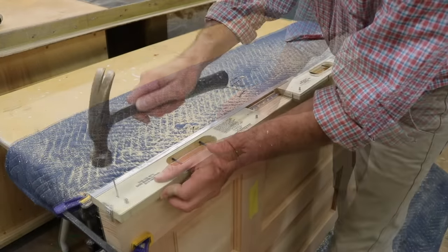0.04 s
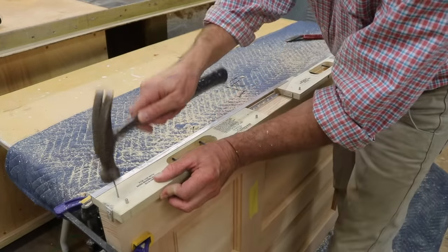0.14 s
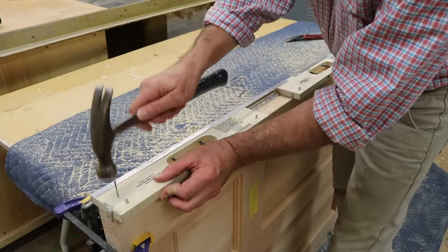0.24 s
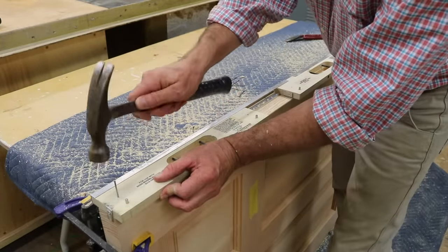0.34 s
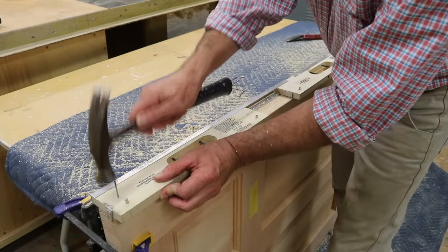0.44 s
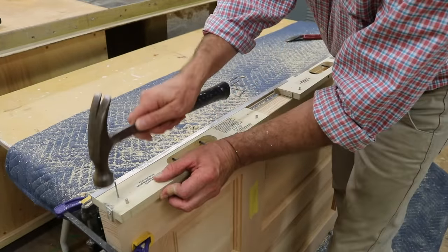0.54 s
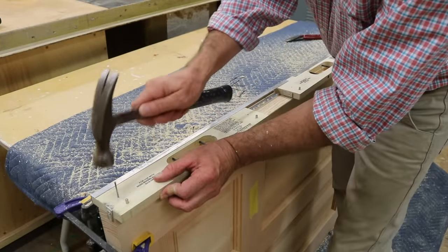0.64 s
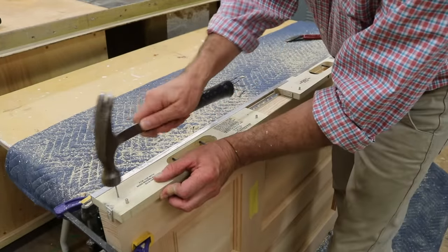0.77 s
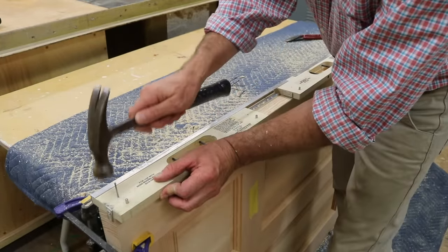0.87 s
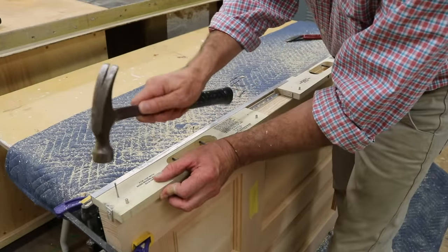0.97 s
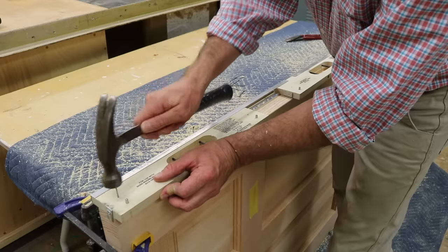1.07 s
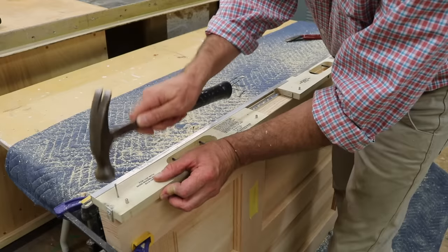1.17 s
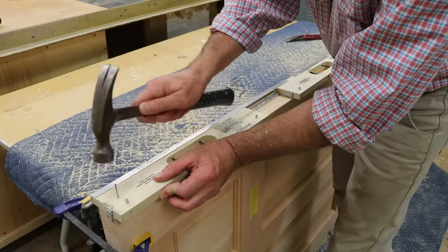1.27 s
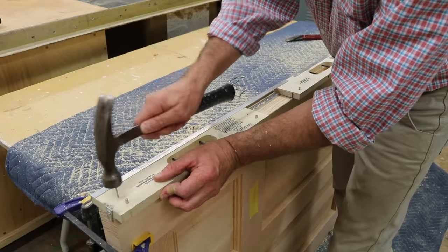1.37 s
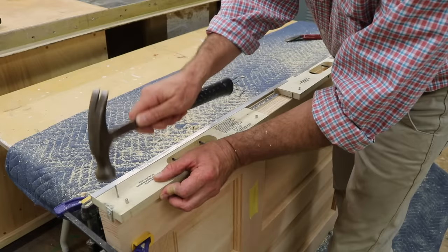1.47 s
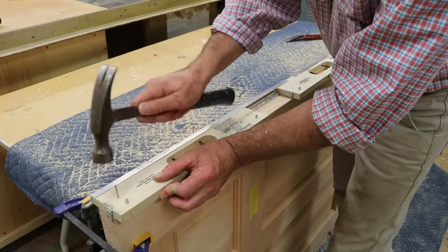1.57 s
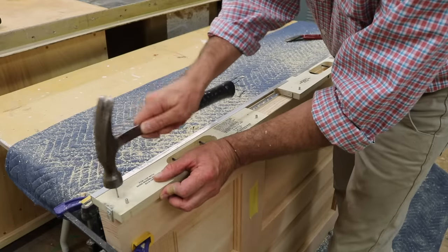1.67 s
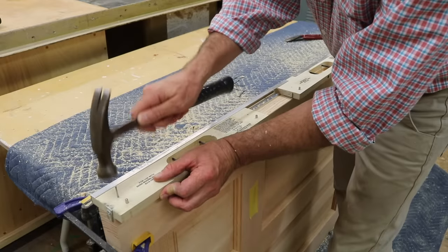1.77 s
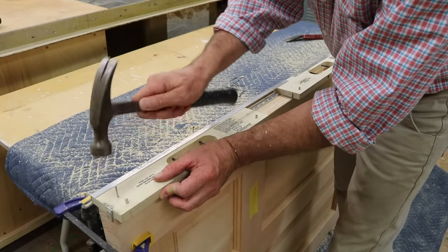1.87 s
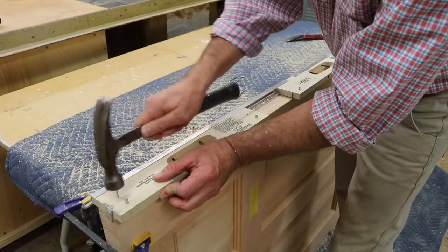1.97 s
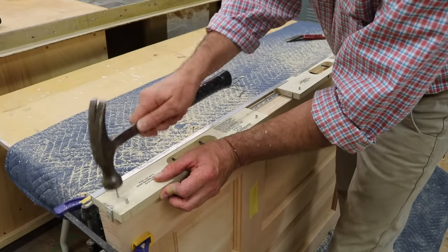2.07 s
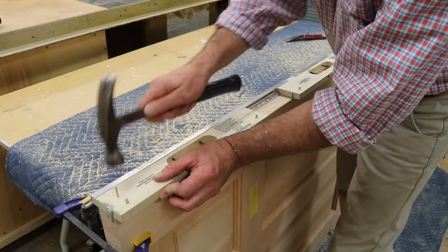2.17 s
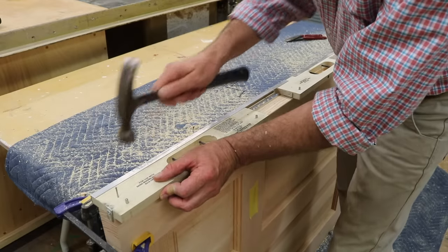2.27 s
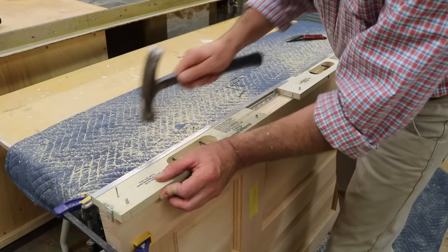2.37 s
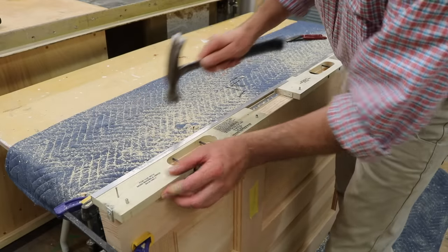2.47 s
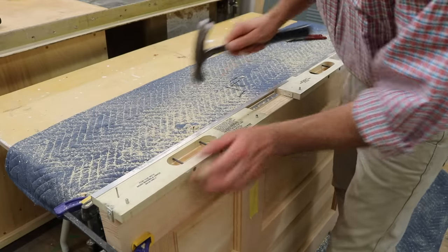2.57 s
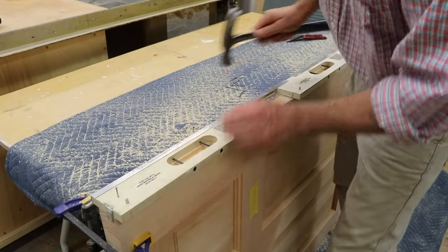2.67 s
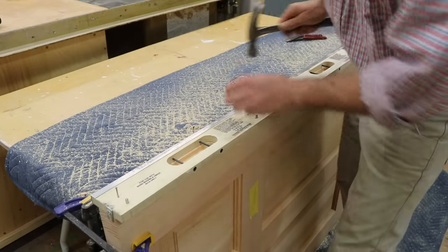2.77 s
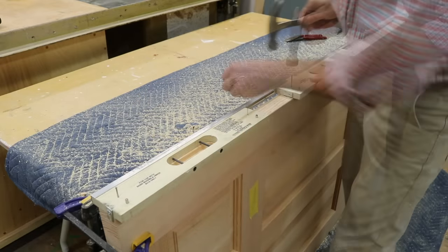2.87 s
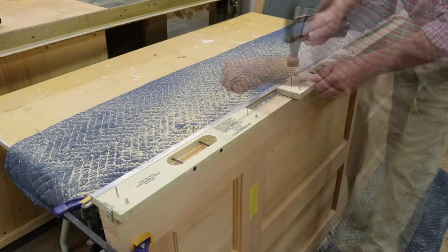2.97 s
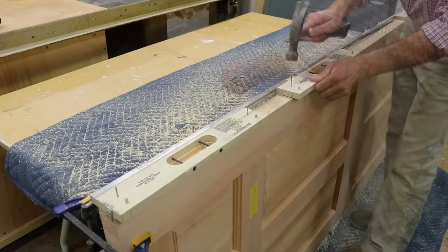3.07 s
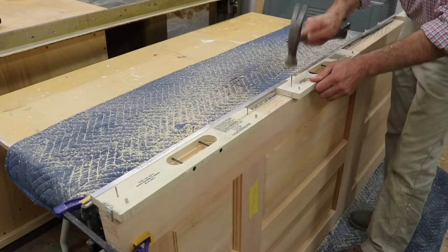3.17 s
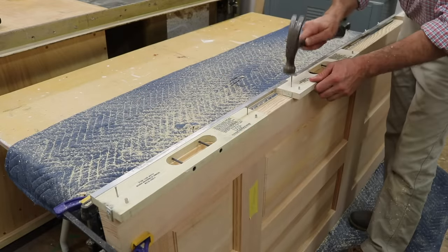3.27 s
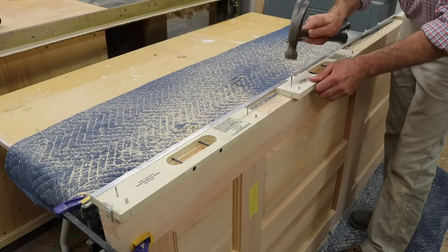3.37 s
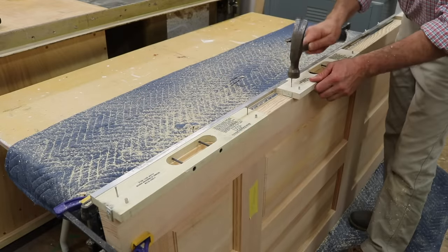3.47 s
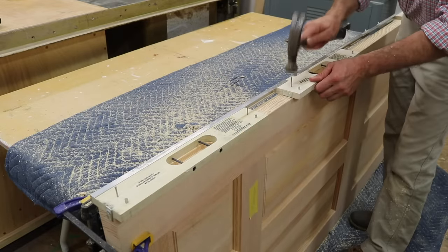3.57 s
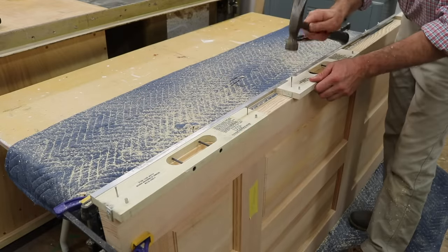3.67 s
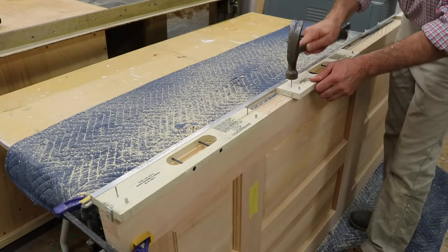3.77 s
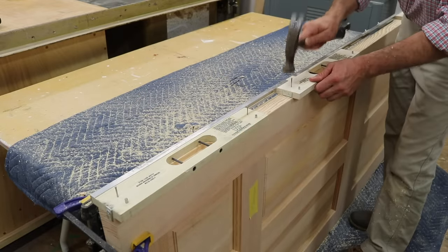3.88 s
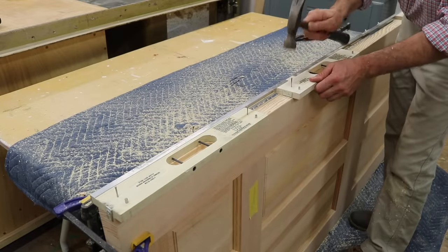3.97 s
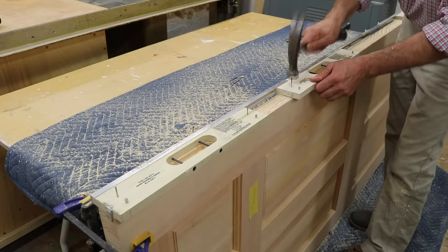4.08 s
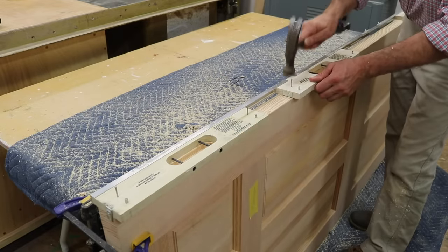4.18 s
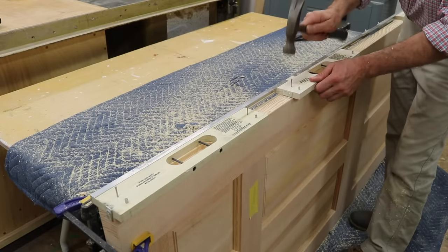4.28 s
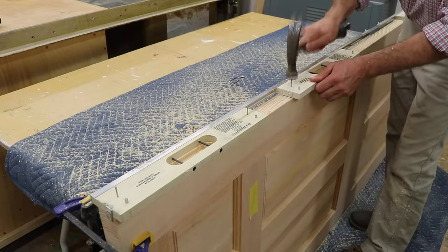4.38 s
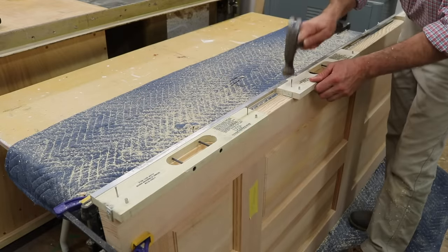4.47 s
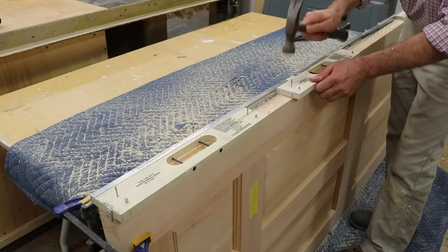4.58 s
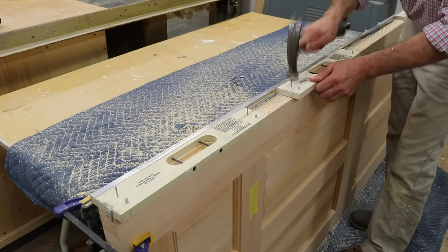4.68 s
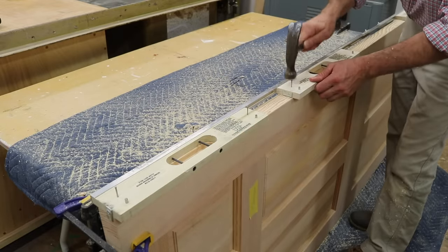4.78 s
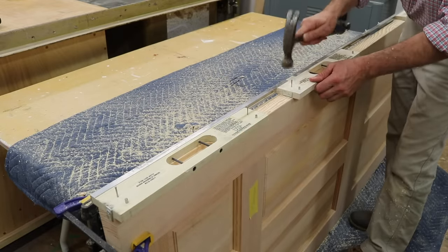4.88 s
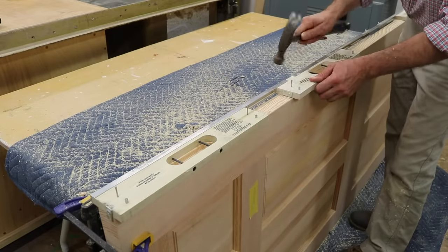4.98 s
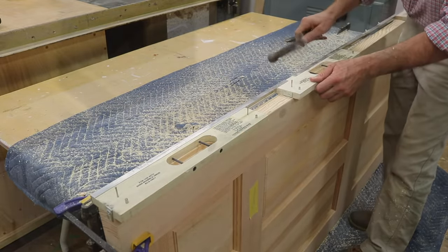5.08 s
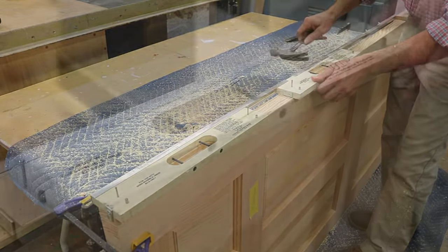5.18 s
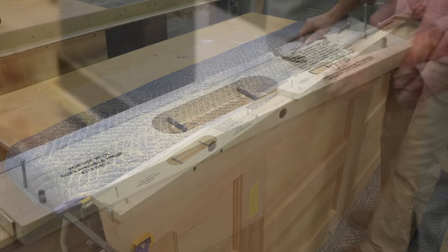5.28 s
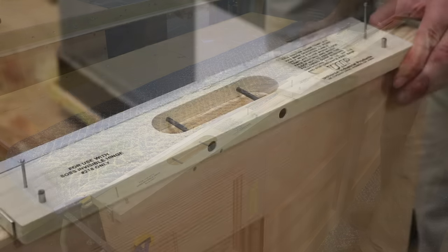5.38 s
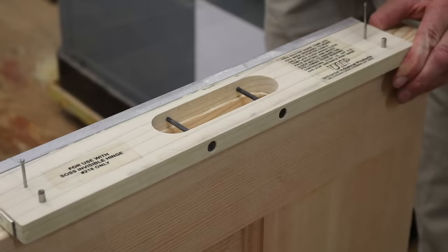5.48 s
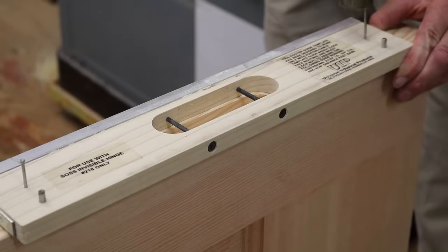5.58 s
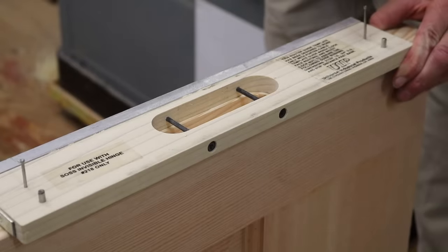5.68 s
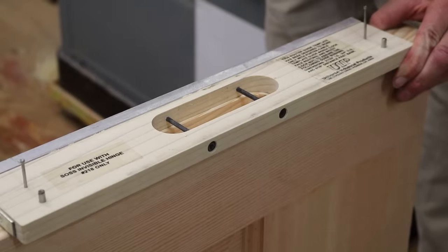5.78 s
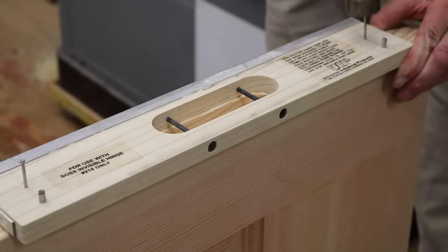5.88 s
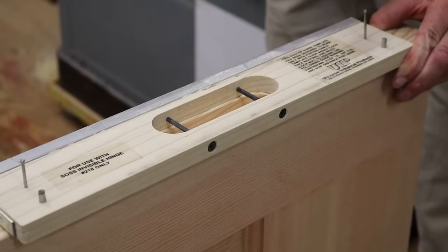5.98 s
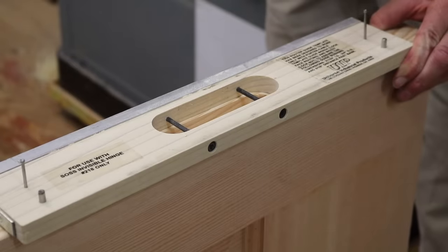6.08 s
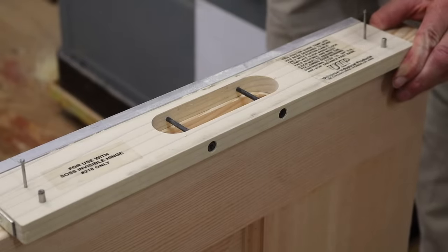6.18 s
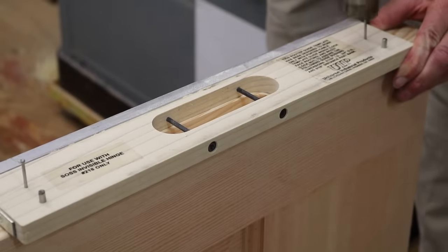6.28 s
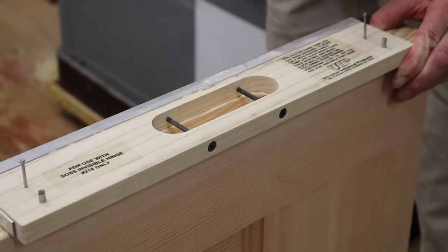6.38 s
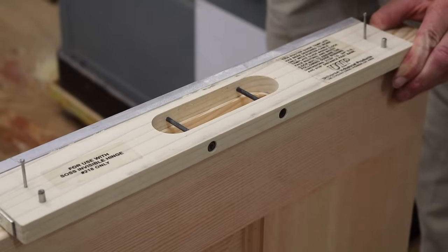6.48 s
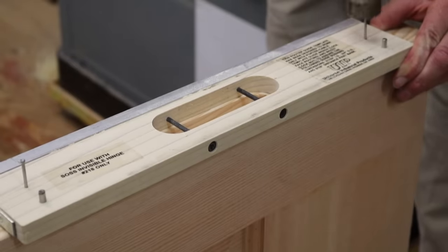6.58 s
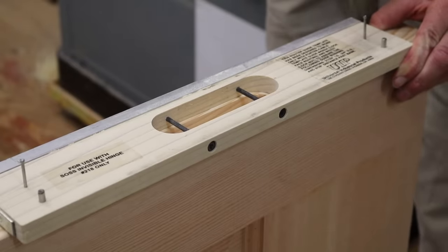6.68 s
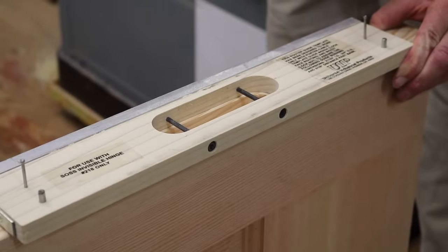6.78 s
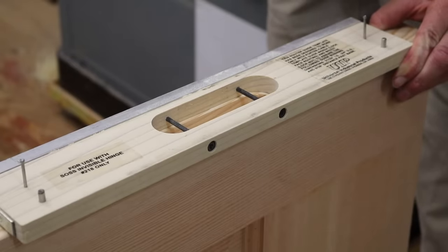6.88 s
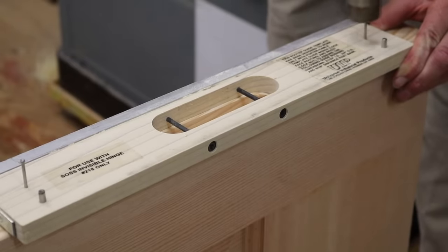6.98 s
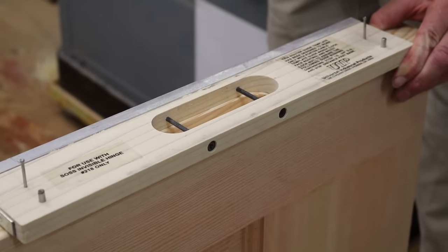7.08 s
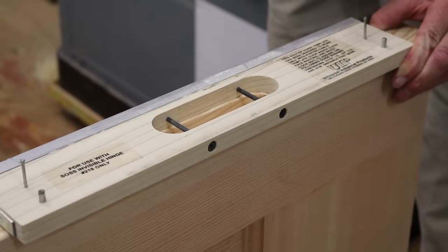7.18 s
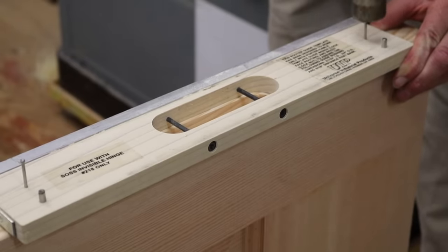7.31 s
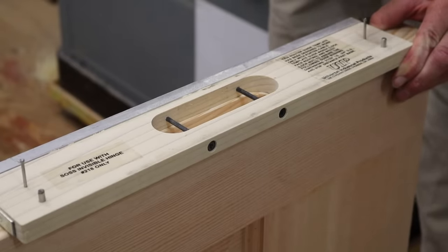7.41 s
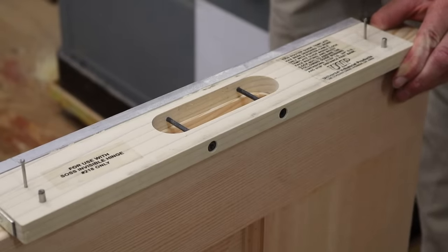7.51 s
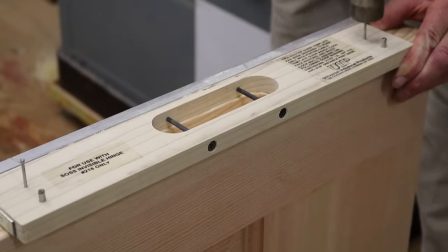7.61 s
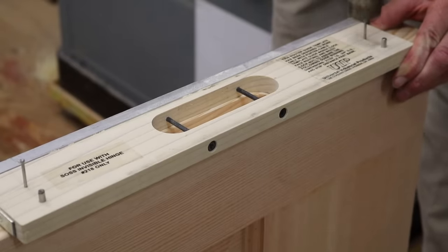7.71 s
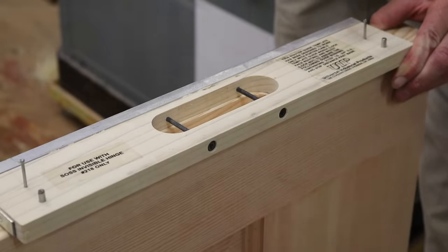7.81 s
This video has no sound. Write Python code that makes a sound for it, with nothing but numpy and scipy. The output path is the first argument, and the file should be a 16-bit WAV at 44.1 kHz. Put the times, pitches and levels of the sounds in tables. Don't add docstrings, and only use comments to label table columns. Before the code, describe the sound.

Close up in a lively workshop, a hammer drives three nails through a wooden jig into a door. Seven even blows, a pause of rustling sleeves and shifting feet, six more, another pause, then seven. Each set starts with a light metallic ping and grows to hard cracks with woody thumps and short room reverberation, over soft steady hiss.

```python
import sys
import numpy as np
from scipy import signal
from scipy.fft import rfft, irfft, next_fast_len
from scipy.io import wavfile
from scipy.ndimage import map_coordinates

SR = 44100
rng = np.random.default_rng(int(sys.argv[2]) if len(sys.argv) > 2 else 0)


def volts(x):
    e = np.asarray(x, float) / 20
    return 10 ** e


def generate_wav(signal):
    frames = np.transpose(np.atleast_2d(signal))
    scaled = np.clip(frames, -1, 1) * 32767
    pcm = np.round(scaled).astype(np.int16)
    wavfile.write(sys.argv[1], SR, pcm)


N = 346089
LONG = 2 ** 15

# ping_hz, width_hz, level_db, slip_s before the wood answers
SETTING = [
    (10930, 1500, 15.5, 0.0074),
    (11900, 510, -4, 0.00105),
    (11860, 460, 22, .01),
]


def unit(x):
    return x / np.sqrt(np.mean(x ** 2) + 1e-20)


def along(points, hz):
    f, v = np.transpose(points)
    return np.interp(np.log(hz + 1), np.log(f + 1), v)


def filtered(x, response):
    size = 2 * next_fast_len(x.shape[-1])
    spectrum = rfft(x, size) * response(np.fft.rfftfreq(size, 1 / SR))
    return irfft(spectrum)[..., :x.shape[-1]]


def noise(size, spectrum):
    return unit(filtered(rng.standard_normal(size), lambda hz: volts(along(spectrum, hz))))


def fade(t, t60, rise):
    return volts(-60 * t / t60) * (1 - np.exp(-t / rise))


def add(track, s, sound):
    track[round(s * SR):][:len(sound)] += sound


def room(room_db, rise):
    # band_hz, t60_s
    shop_t60 = [(60, 0.54), (200, 0.45), (600, 0.52), (1500, 0.55), (4000, 0.53), (8000, 0.47),
                (15000, 0.34)]
    # band_hz, level_db
    shop_colour = [(60, -33.5), (200, 15), (600, 4), (2000, -1), (5000, -2.5), (9000, -5.5), (15000, -7.5)]
    hz, t, z = signal.stft(rng.standard_normal(LONG), SR, nperseg=256)
    shape = along(shop_colour, hz)[:, None] - 60 * t / along(shop_t60, hz)[:, None]
    tail = signal.istft(z * volts(shape), SR, nperseg=256)[1][:LONG]
    tail = tail * (1 - np.exp(-np.arange(LONG) / (rise * SR)))
    return volts(room_db) * tail / np.linalg.norm(tail)


def resonance(modes, top_hz):
    f = np.fft.rfftfreq(LONG // 4, 1 / SR)
    power = 0
    for centre, width, db in modes:
        damping = (f * width) ** 2
        peak = damping / ((centre * centre - f * f) ** 2 + damping)
        power = power + volts(2 * db) * peak ** 1.28
    dulled = power / (1 + (f / top_hz) ** 2) ** 2
    cepstrum = irfft(np.log(dulled + 1e-9) / 2)
    cepstrum[1:len(f) - 1] *= 2
    cepstrum[len(f):] = 0
    pulse = irfft(np.exp(rfft(cepstrum)))[:len(f)]
    return pulse / np.linalg.norm(pulse)


def strike(modes, top_hz, t60, rise, room_db):
    grain = 0.3
    contact = rng.standard_normal(LONG) * fade(np.arange(LONG) / SR, t60, rise)
    contact = contact / np.linalg.norm(contact)
    click = np.arange(LONG) == 0
    sent = grain * contact + np.sqrt(1 - grain ** 2) * click
    echo = signal.fftconvolve(sent[:LONG // 8], room(room_db, rise + 0.0005))[:LONG]
    struck = signal.fftconvolve(contact + echo, resonance(modes, top_hz))
    return struck * np.sqrt(t60 * SR / 120)


def swells(moves):
    t = np.arange(N) / SR
    power = 0
    for s, length, db in moves:
        phase = np.clip((t - s) / length, -.5, .5)
        power = power + volts(2 * db) * np.cos(np.pi * phase) ** 4
    return np.sqrt(power)


def nails():
    # start_s, click_db, knock_db, nail_ring_hz, ring_over_knock_db
    blows = [(0.2137, -9.5, -24, 990, -19), (0.524, -8.5, -14, 760, -26), (.826, -1, -12.5, 1200, -21),
             (1.1214, 3.5, -10, 1466, -3), (1.42, 6.5, -7, 1693, -7.5), (1.719, 8.5, -4, 1875, -7),
             (2.0378, 12, -2, 2130, -12), (3.2741, -10, -13, 1121, -0.5), (3.5331, 0.5, -9.5, 1200, 0),
             (3.834, 4.5, -6.5, 1447, -3), (4.146, 6.5, -3.5, 1520, -12), (4.4452, 10.5, -1.5, 1326, -29),
             (4.746, 11.5, -0.9, 1290, -17), (5.6079, -23.5, -21.5, 593, -19),
             (5.9174, -5.5, -8.5, 1032, -0.5), (6.261, 3.5, -8.5, 1490, -5.5), (6.625, 8.5, -5, 1894, -3),
             (6.989, 12, -4.5, 2200, -11), (7.342, 16, -2.5, 2800, -13), (7.662, 16.5, -3, 2720, -14)]
    next_nail = [3, 5.4]
    places = np.searchsorted(next_nail, [row[0] for row in blows])
    return zip(blows, places, np.diff(places, prepend=-1) > 0)


def hiss():
    # band_hz, level_db per Hz
    hiss_colour = [(12, -47), (20, -9), (91, 1.5), (966, -5), (2730, -9.5), (5210, -13), (15200, -13.5),
                   (16500, -20.5)]
    return volts(-64) * noise(N, hiss_colour)


def handling(track):
    # start_s, peak_db, pitch_hz, width_hz
    ticks = [(.037, -50, 850, 300), (.102, -52, 550, 200), (.113, -35, 800, 350), (2.424, -46, 3500, 3000),
             (2.438, -28, 800, 250), (2.589, -32, 1100, 1200), (2.62, -42, 500, 500),
             (2.635, -45, 1300, 1500), (3.18, -52, 480, 300), (3.206, -46, 1300, 900),
             (5.204, -42, 900, 1200), (5.299, -37, 900, 1200), (5.507, -36, 550, 600)]
    # peak_s, length_s, level_db
    sleeves = [
        (0, 0.091, -68),
        (2.52, 0.48, -57),
        (2.65, 0.21, -63.5),
        (2.89, 0.29, -58.5),
        (5.2, 0.47, -63),
        (5.37, 0.9, -59.5),
    ]
    # peak_s, length_s, level_db
    feet = [
        (.11, 0.48, -66),
        (2.48, 0.74, -60),
        (3.22, .2, -65),
        (5.17, 0.55, -60),
        (5.52, .3, -58.5),
    ]
    # band_hz, level_db per Hz
    cloth = [(100, -2), (250, 4), (500, 2.5), (900, -2), (1500, -7), (3000, -13.5), (5000, -21.5),
             (9000, -30)]
    # band_hz, level_db per Hz
    rumble = [(12, -21), (25, -16), (60, -16), (95, 0), (140, -6.5), (300, -33.5)]
    for s, db, hz, width in ticks:
        modes = [(hz, width, 0), (2500, 4000, -24)]
        add(track, s, volts(db) * strike(modes, 6000, t60=.02, rise=.0005, room_db=-7))
    waver_db = 2.5 * map_coordinates(rng.standard_normal(300), [np.linspace(0, 299, N)])
    brush = noise(N, cloth) * volts(waver_db)
    track[:N] += swells(sleeves) * brush
    track[:N] += swells(feet) * noise(N, rumble)


def steel(track):
    # pitch_hz, width_hz, level_db
    crack = [(2660, 2700, 4), (12200, 14000, -5)]
    # pitch_hz, width_hz, level_db
    head_modes = [(2130, 1600, 6), (3440, 470, 6), (2890, 1400, 7.5)]
    # pitch_hz, width_hz, level_db
    face_modes = [
        [(7460, 700, -3.5), (11200, 440, -5.5), (14580, 800, -4.5)],
        [(5420, 530, -19.5), (9130, 930, 2.5), (13780, 2700, 3)],
        [(6770, 300, 6.5), (8870, 880, -7.5), (12700, 1700, -3.5)],
    ]
    head_rises_hz = [60, 1, 5.2]
    head_fades = [.05, .45, 0.058]
    face_dulls = [0.36, 0.49, 0.23]
    t60, rise = .009, .0001
    edge_dulls = 0.43
    body, (edge_hz, edge_width, edge_db) = crack
    for (s, db, *_), place, first in nails():
        head_hz, head_width, head_db = head_modes[place]
        head_hz = head_hz + head_rises_hz[place] * db
        head_db = head_db - head_fades[place] * db
        edge = (edge_hz, edge_width, edge_db - edge_dulls * db)
        modes = [body, edge, (head_hz, head_width, head_db)]
        if first:
            modes.append(SETTING[place][:3])
        add(track, s, volts(db) * strike(modes, 19000, t60, rise, room_db=-5.5))
        if not first:
            face_db = db - 5.5 - face_dulls[place] * db
            add(track, s, volts(face_db) * strike(face_modes[place], 22000, t60, rise, room_db=-16))


def wood(track):
    # pitch_hz, width_hz, level_db
    edge_modes = [
        [(215, 39, -5.5), (308, 70, -29), (364.6, 65, -1.5), (441, 6.9, -1), (682, 180, -0.5), (1090, 1800, -6)],
        [(225, 170, -5), (333, 120, -1.5), (602, 160, -6.5), (762, 150, -0.5), (1200, 640, -8.5)],
        [(214, 55, -8.5), (293, 38, -7.5), (368.3, 12.4, 0), (512, 92, -1.5), (792, 167, 1.5), (1310, 330, -4)],
    ]
    # pitch_hz, level_db, t60_s
    panel = [
        [(70, -18.5, 0.41), (95.6, -1, 0.15), (149, -7, 0.15)],
        [(74, -31.5, .3), (93.4, 6, 0.093), (154.7, 0, 0.096)],
        [(42.6, -18.5, 1), (77.3, -6, 0.35), (129, 7.5, 0.07), (166, 1, 0.092)],
    ]
    thud_db = [-17.5, -19, -23.5]
    low_db = [0.5, -9, 1.5]
    t = np.arange(SR // 2) / SR
    lag_s = 0.00192
    split_hz = 450
    thud_grows, thud_full_db = 0.43, 9
    wet_grows = 0.12
    boom_rise, ring_rise, ring_t60 = .011, .008, .08
    for (s, click_db, knock_db, nail_hz, nail_db), place, first in nails():
        s = s + lag_s + first * SETTING[place][-1]
        modes = [(hz, w, db + low_db[place] * (hz < split_hz)) for hz, w, db in edge_modes[place]]
        modes.append((nail_hz, 0.26 * nail_hz, -3))
        knock = strike(modes, 3000, t60=.045, rise=.003, room_db=-4 + wet_grows * knock_db)
        add(track, s, volts(knock_db + 4.0) * knock)

        boom = 0
        for hz, db, t60 in panel[place]:
            boom = boom + volts(db) * fade(t, t60, boom_rise) * np.sin(2 * np.pi * hz * t)
        boom_db = thud_db[place] + thud_grows * min(click_db, thud_full_db)

        turn = 2 * np.pi * nail_hz * t
        bend = np.sin(turn) + 0.74 * np.sin(1.07 * turn) + volts(-20) * np.sin(2.6 * turn)
        ring = fade(t, ring_t60, ring_rise) * (1 - np.exp(-t / ring_rise)) * bend

        tones = volts(boom_db) * boom + volts(knock_db + nail_db + 3.5) * ring
        direct = np.arange(LONG) == 0
        add(track, s, signal.fftconvolve(tones, direct + room(-8.5, 0.0052)))


def scene():
    track = np.zeros(N + 2 * SR)
    handling(track)
    steel(track)
    wood(track)
    return (track[:N] + hiss())[None]


def limiter(x, top_db, attack, release_db):
    over = np.maximum(20 * np.log10(np.abs(x) + 1e-9) - top_db, 0)
    climb = release_db * np.arange(N) / SR
    duck = np.maximum.accumulate(over + climb) - climb
    keep = np.exp(-1 / (attack * SR))
    return x * volts(-signal.lfilter([1 - keep], [1, -keep], duck))


def low_pass(x):
    return signal.sosfilt(signal.butter(12, 17110, fs=SR, output="sos"), x)


def record(dry):
    x = limiter(dry[0], top_db=-1.5, attack=0.0088, release_db=106.5)
    top = .64
    x = x / (1 + np.abs(x / top) ** 4) ** (1 / 4)
    x = signal.sosfilt(signal.cheby2(12, 40, 16400, fs=SR, output="sos"), x)
    return low_pass(x[None])


dry = scene()
out = record(dry)
generate_wav(out)
```